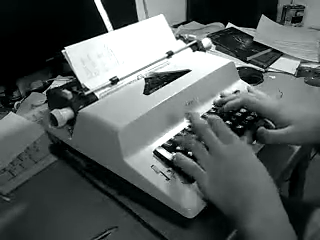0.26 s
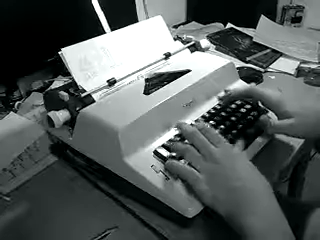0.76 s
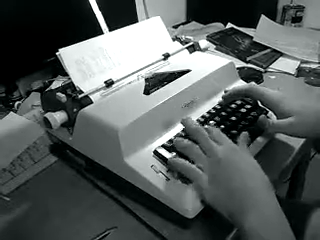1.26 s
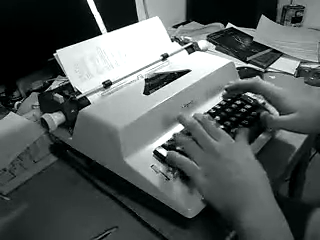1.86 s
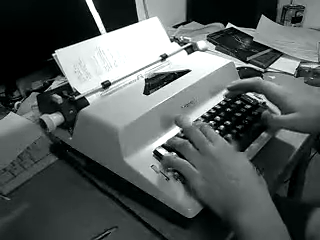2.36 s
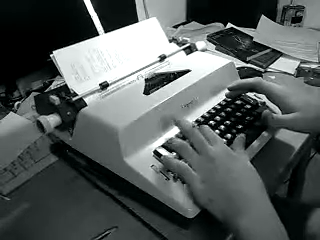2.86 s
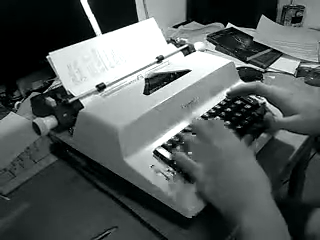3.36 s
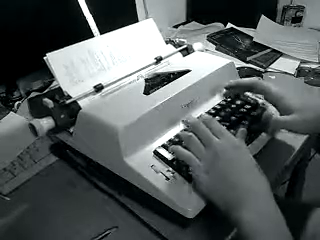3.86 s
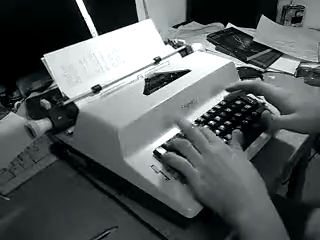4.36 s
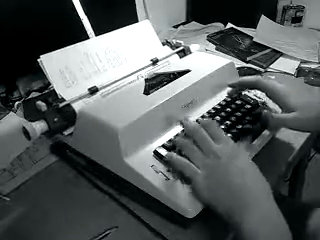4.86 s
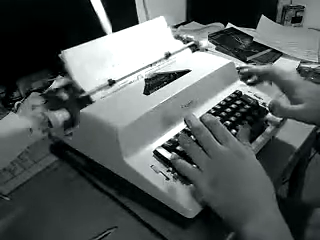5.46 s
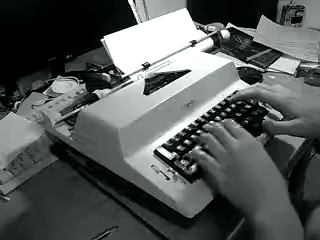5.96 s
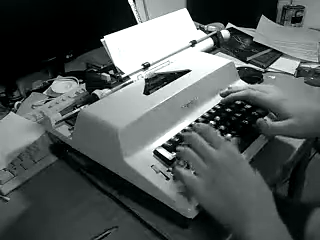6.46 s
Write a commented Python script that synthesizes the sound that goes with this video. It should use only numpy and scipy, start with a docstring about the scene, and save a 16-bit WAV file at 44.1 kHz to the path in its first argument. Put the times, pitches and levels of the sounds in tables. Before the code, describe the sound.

Close, bright electric typewriter typing at a brisk pace in a quiet room, ending with a rattling carriage return and one last keystroke.

```python
"""Electric typewriter, close

A typewriter on a desk in a quiet room, close to a small microphone. Each key trips a linkage, the type bar
swings up and strikes: noise bursts drive steel and case, and single bars ring as dying sines. The carriage
steps on with a thud that booms in the desk. Near the end the motor draws it back, sliding over a throbbing
drone, and it bangs against its stop; small ticks follow. A short echo and a faint hush fill the room."""
import sys
import numpy as np
from scipy import signal
from scipy.io import wavfile
from scipy.ndimage import uniform_filter1d, minimum_filter1d

SR = 44100
rng = np.random.default_rng(int(sys.argv[2]) if len(sys.argv) > 2 else 0)


def how_loud(loudness_db):
    """Turn decibels into a plain amplitude multiplier (0 dB gives 1, 20 dB gives 10)."""
    steps = np.asarray(loudness_db, float) / 20
    return 10 ** steps


def digitize_waveform(pressure):
    """Quantize a signal to 16-bit integers and store it at the path in sys.argv[1].

    Rows of a 2-D input are taken as channels; values are limited to [-1, 1].
    """
    field = np.atleast_2d(pressure).T
    bounded = np.clip(field, -1, 1)
    quanta = np.round(bounded * 32767).astype(np.int16)
    wavfile.write(sys.argv[1], SR, quanta)


N = 295470

# spectrum of the rattling steel: [frequency_hz, relative level_db per Hz]
STEEL_SPECTRUM = [(410, -58), (700, -16), (974, -17), (1170, -15.5), (2020, -11), (2590, -5.5),
                  (2810, -4.5), (3040, -8.5), (3610, -6), (4280, -5), (5100, -3), (5900, -4.5),
                  (6500, -9.5), (7870, -18.5), (14800, -43.5), (15900, -48.5), (16500, -58)]
# small sharp ticks as the machine settles: [start_s, level_db, case_db beside it, length_s]
SETTLING_TICKS = [(5.999, -34.5, -11, 0.023), (6.054, -45.5, -9.5, 0.032), (6.124, -60, -5, 0.065),
                  (6.247, -61.5, -3, 0.022), (6.388, -59.5, -6.5, 0.025)]
# hard strokes, type on platen: [strike_s, trip_lead_s, trip_db, swing_db, carriage_step_db]
HARD_STROKES = [(0.0921, .033, -22, -16.5, -23), (0.4543, 0.033, -18, -24, -23),
                (1.2919, 0.024, -24, -24.5, -23), (1.5289, 0.02, -36.5, -22.5, -25),
                (2.2756, 0.018, -27, -41, -22), (2.8878, 0.026, -37, -32.5, -22),
                (3.057, 0.031, -20, -27, -25.5), (3.2238, 0.027, -24.5, -32, -23.5),
                (3.651, .034, -34, -16, -23), (3.8254, 0.023, -34, -18.5, -23),
                (4.3875, 0.027, -21.5, -25, -22.5), (4.7532, .03, -29, -22, -24),
                (5.0578, 0.023, -23, -23.5, -22), (6.705, 0.045, -30, -30.5, -23)]
# soft strokes, chains of lighter knocks: [main_knock_s, main_db, trip_db, lift_db, rebound_db]
SOFT_STROKES = [(0.297, -12, -18.5, -17.5, -15.5), (0.637, -10.5, -23, -17, -21),
                (.819, -13, -22, -14, -14), (1.035, -16, -22.5, -14.5, -14.5),
                (1.7708, -10.5, -23.5, -13.5, -18.5), (2.538, -12, -23, -12.5, -20.5),
                (3.409, -12.5, -21.5, -22, -12), (4.1762, -9, -25.5, -13, -14.5),
                (4.585, -9.5, -18.5, -17, -15), (4.9086, -13, -20.5, -15.5, -12)]


def evened(x):
    """Scales to rms 1."""
    return x / np.sqrt(np.mean(x ** 2) + 1e-20)


def read(points, hz):
    """Reads a table on a log-frequency axis."""
    f, value = np.transpose(points)
    return np.interp(np.log(hz + 1), np.log(f + 1), value)


def colour(points):
    """Causal impulse response of energy 1 with the given spectrum (minimum phase)."""
    spectrum_db = read(points, abs(np.fft.fftfreq(8192, 1 / SR)))
    log_gain = np.log(how_loud(np.maximum(spectrum_db, -100)))
    taps = np.fft.ifft(np.exp(np.conj(signal.hilbert(log_gain)))).real[:4096]
    return taps / np.linalg.norm(taps)


def ring(modes):
    """Impulse response of energy 1 made of dying modes: [frequency_hz, level_db, t60_s]."""
    t = np.arange(SR // 3) / SR
    taps = sum(how_loud(db - 60 * t / max(t60, .01)) * np.sin(2 * np.pi * hz * t) for hz, db, t60 in modes)
    return taps / np.linalg.norm(taps)


def chatter(spread_db, share):
    """Dense tiny impacts of uneven size on a share of the samples, rms 1."""
    size = how_loud(spread_db * np.minimum(rng.exponential(1, N), 5))
    return evened(size * rng.standard_normal(N) * (rng.random(N) < share))


def burst(s, db, length, swing, swing_db, bend, snap_db):
    """Span and power of a swell up to s, a short snap, and a decay that quickens when bend exceeds 1."""
    at = np.arange(max(round((s - .06) * SR), 0), min(round((s + 0.38) * SR), N))
    t = at / SR - s
    after = np.maximum(t, 0)
    decay = np.exp(-(after / np.clip(length, .003, .2)) ** bend)
    snap = how_loud(snap_db) * np.exp(-after / 0.001)
    rise = how_loud(swing_db) * np.exp(np.minimum(t, 0) / swing)
    return at, (how_loud(db) * np.where(t < 0, rise, decay + snap)) ** 2


def add(mix, at, sound):
    """Mixes in place."""
    mix[at] += sound


def through(drive, taps):
    """Convolution cut to length."""
    return signal.oaconvolve(drive, taps)[:N]


def swing_of(db):
    """Hardness 0 to 1 of a knock, with its swell time (s), swell dB and snap dB: hard blows snap more."""
    hard = np.clip((db + 10) / 5, 0, 1)
    return hard, .0035 + .004 * hard, -6 - 8 * hard, -9 + 7 * hard


def hard_knocks():
    """A hard stroke trips the key, swings the type bar up, strikes and bounces."""
    # bounces of the type bar, timing and level then varied: [after_strike_s, level_db beside the strike]
    bounces = [(.004, 0), (.0105, -5.5), (.024, -11)]
    strike_db, strike_case_db = -4, -28.
    rows = []
    for s, lead, trip_db, swing_db, _ in HARD_STROKES:
        rows.append((s - lead, trip_db, -18.5, .05))
        rows.append((s - .015, swing_db, -12., 0.02))
        rows.append((s, strike_db, strike_case_db, 0.059))
        uneven = rng.uniform(-1, 1, (len(bounces), 2))
        for (lag, db), (late, louder) in zip(bounces, uneven):
            bounce_s = s + lag * (1 + .15 * late)
            rows.append((bounce_s, strike_db + db + 2.5 * louder, strike_case_db, .004))
    return rows


def soft_knocks():
    """A soft stroke is a finger landing, a trip, a lift, a main knock and a rebound."""
    rows = []
    for s, main_db, trip_db, lift_db, rebound_db in SOFT_STROKES:
        rows.append((s - .066, trip_db - 11, -15.5, .05))  # the finger lands
        rows.append((s - .046, trip_db, -20.5, 0.051))
        rows.append((s - .013, lift_db, -25.5, 0.052))
        for lag, db, case_db, length in ((0, main_db, -27, 0.043), (.030, rebound_db, -19.5, 0.043)):
            rows.append((s + lag, db, case_db, length))
            rows.append((s + lag, db + 2, case_db, 0.0018))  # starts with a click
    return rows


def knocks():
    """Every knock of steel on steel: [start_s, level_db, case_db beside it, length_s]."""
    # the return clutch takes hold, later the carriage meets its stop: columns as above
    return_knocks = [(5.3117, -29.5, -18, .05), (5.33, -16.5, -21, 0.047), (5.352, -9, -23.5, 0.02),
                     (5.39, -8.5, -20, 0.022), (5.411, -10.5, -18.5, 0.037), (5.5976, -38, -12, 0.035),
                     (5.7502, -7.5, -19.5, 0.02), (5.789, -7, -27.5, 0.037), (5.8005, -9, -25, 0.043),
                     (5.8387, -14.5, -17.5, 0.06)]
    rows = list(return_knocks) + hard_knocks() + soft_knocks()
    return [row for row in rows if row[0] < N / SR]


def thuds():
    """Every step or landing of the carriage: [start_s, level_db, length_s, desk_boom_db beside it]."""
    # the carriage jerks off and lands: columns as above
    return_thuds = [(5.44, -34.5, 0.078, -10), (5.806, -18, 0.017, -16.5), (5.849, -18.5, 0.025, -28.5)]
    rows = [(s + .063, step_db, 0.026, -21) for s, *_, step_db in HARD_STROKES]
    rows += [(s + .055, -23, 0.022, -22.5) for s, *_ in SOFT_STROKES]
    return [row for row in rows + return_thuds if row[0] < N / SR]


def steel(blows):
    """Heavier levers knock below 4 kHz, light links above; hard blows click and ring the frame more."""
    # frame and type bars: [frequency_hz, level_db, t60_s]
    frame_modes = [(2770, -8, .04), (3680, -7, .05), (4240, -7, .05), (4975, -6, .06), (5245, -5, .07),
                   (5405, -5, .07), (5645, -3, .1), (5755, -2, .12), (5912, -1.5, .12), (6068, -3, .12),
                   (6305, -6, .08), (6510, -9, .07), (9300, -18, .05)]
    light, heavy, frame, clicks = np.zeros((4, N))
    for s, db, _, length in blows:
        hard, swing, swing_db, snap_db = swing_of(db)
        add(light, *burst(s, db - 12.0, length, swing, swing_db, 1.44, snap_db))
        heavy_db = 1.203 * db - 11.0 - 2.5 * hard
        add(heavy, *burst(s, heavy_db, length * 1.01, swing, swing_db, 1.25, snap_db + 5.5))
        add(frame, *burst(s, db - 28.0 + 5.5 * hard, length, swing, swing_db, 1.5, -10.0))
        add(clicks, round(s * SR), hard * how_loud(db + 3.5))  # each hard blow starts with one click
    for s, db, _, length in SETTLING_TICKS:
        for power in (light, heavy):
            add(power, *burst(s, db - 8.5, length, .001, -6, 1, -1))
    low, high = (signal.butter(2, 4000, kind, fs=SR, output="sos") for kind in ("low", "high"))
    rattle = chatter(1.2, 0.3)
    levers = signal.sosfilt(low, np.sqrt(heavy) * chatter(1.2, .25))
    links = signal.sosfilt(high, np.sqrt(light) * rattle)
    struck = through(levers + links + clicks, colour(STEEL_SPECTRUM))
    return struck + through(np.sqrt(frame) * rattle, ring(frame_modes))


def small_parts(blows):
    """Small steel clatters high, nearly as much for light blows as for hard ones; some parts tink alone."""
    # pitches of springs and links: [pitch_hz]
    tink_pitches = [5400, 6220, 7600, 9100, 9500, 10600, 11700, 13000, 14100]
    power = np.zeros(N)
    for s, db, _, length in blows:
        hard, swing, _, _ = swing_of(db)
        add(power, *burst(s, db - 2.7 * hard, length, swing, -8.5, 1.6, -9.0))
    # the second difference tilts the clatter towards the treble
    clatter = np.diff(power ** .43 * chatter(2.2, .1), 2, prepend=[0, 0])
    sound = through(how_loud(-22.0) * clatter, colour(STEEL_SPECTRUM))
    for hz in tink_pitches:
        chance = rng.random(N) < 14 / SR  # 14 openings a second, heard only where the parts move
        struck = power ** 0.42 * chance * how_loud(3.3 * rng.standard_normal(N))
        sound += how_loud(9. + read(STEEL_SPECTRUM, hz)) * through(struck, ring([(hz, 0, .014)]))
    return sound


def bar_pings():
    """Single bars ring out clearly as dying sines; only the long, low bars sound overtones."""
    # bars that ring: [start_s, nominal pitch_hz, level_db]
    ringing_bars = [(.105, 3670, -14.5), (.2987, 3690, -14.5), (.6389, 3700, -11), (0.822, 3680, -15.5),
                    (1.0377, 3680, -17.5), (1.7704, 3656, -12.5), (2.278, 2540, -19.5),
                    (2.5376, 3565, -17.5), (4.9058, 2757, -18.5), (5.059, 3480, -17), (5.3912, 4350, -14),
                    (6.662, 4450, -50)]
    # partials of a bar: [multiple of its nominal pitch, level_db]
    partials = [(1.001, 2), (2.021, -8.5), (3.15, -23)]
    sound = np.zeros(N)
    t = np.arange(1400) / SR
    for s, hz, db in ringing_bars:
        swell = (1 - np.exp(-t / 0.0007)) * how_loud(db - 60 * t / 0.047)
        sounding = partials[:3 if hz < 3900 else 1]
        bar = sum(how_loud(part_db) * np.sin(2 * np.pi * k * hz * t) for k, part_db in sounding)
        add(sound, round(s * SR) + np.arange(len(t)), swell * bar)
    return sound


def case(blows, steps):
    """Knocks, ticks and thuds shake the case, a coloured noise with ringing modes."""
    # spectrum of the case: [frequency_hz, relative level_db per Hz]
    case_spectrum = [(18, -63), (30, -14), (125, -3), (265, -10.5), (353, -26), (550, 4.5), (779, -4.5),
                     (1040, 2), (1260, -1.5), (1500, 0), (3000, -2.5), (3900, -24), (6600, -120)]
    # resonances of the case: [frequency_hz, level_db, t60_s]
    case_modes = [(438, 5, 0.12), (610, -8, 0.063), (983, 1.5, 0.27), (1050, 4.5, 0.06), (1336, 2.5, 0.037),
                  (1590, -1, 0.079)]
    power = np.zeros(N)
    for s, db, case_db, length in blows:
        add(power, *burst(s, db + case_db - 6.0, length * 1.48, 0.0062, -3.5, 1.74, -13.0))
    for s, db, case_db, length in SETTLING_TICKS:
        add(power, *burst(s, db + case_db, length, .001, -6, 1, -1))
    for s, db, length, _ in steps:
        add(power, *burst(s, db - 5.5, length, 0.013, -0.76, 1.0, -16.5))
    drive = np.sqrt(power) * chatter(1.8, .3)
    return through(drive, colour(case_spectrum)) + how_loud(-7.5) * through(drive, ring(case_modes))


def desk(steps):
    """Each thud pushes the desk top with a smooth short pulse, and its modes boom."""
    # boom of the desk top: [frequency_hz, level_db, t60_s]
    desk_modes = [(134.4, -5, 0.24), (247.2, -4.5, 0.21)]
    pushes = np.zeros(N)
    for s, db, _, boom_db in steps:
        add(pushes, round(s * SR) + np.arange(120), how_loud(db + boom_db) * np.hanning(120))
    return through(pushes, ring(desk_modes))


def typing():
    """Knocks rattle the steel and, more weakly, the case; thuds shake the case and push the desk."""
    blows, steps = knocks(), thuds()
    return steel(blows) + small_parts(blows) + bar_pings() + case(blows, steps) + desk(steps)


def carriage():
    """Rack teeth and rollers chatter while the carriage slides, over the wavering drone of the drive."""
    # spectrum of the sliding carriage: [frequency_hz, relative level_db per Hz]
    slide_spectrum = [(35, -66), (60, -22.5), (133, -8.5), (308, -16), (354, -6), (480, -20.5),
                      (636, -12.5), (1620, -8.5), (2970, -13), (5500, -12), (7200, -24.5), (9000, -30.5),
                      (16000, -53)]
    start_s, end_s, drone_peak_s = 5.46, 5.725, 5.524
    t = np.arange(N) / SR
    on = np.interp(t, [start_s - .02, start_s, end_s, end_s + 0.016], [0, 1, 1, 0])
    teeth = chatter(1.8, 0.15)
    slide_ring = ring([(1617, -1, 0.12), (2520, -1, .06)])
    slide = through(teeth, colour(slide_spectrum)) + how_loud(-11.5) * through(teeth, slide_ring)
    waver = evened(uniform_filter1d(rng.standard_normal(N), 900))
    drone = np.sin(2 * np.pi * np.cumsum(356. + 6. * waver) / SR)  # Hz
    # throbs at 10 Hz, 7 dB deep, with a peak at drone_peak_s
    throb = how_loud(-46.5 - 7 * np.sin(np.pi * 10 * (t - drone_peak_s)) ** 2)
    fade_in = np.clip(1 + (t - drone_peak_s) / .04, 0, 1)
    return on * (how_loud(-43.5) * slide + fade_in * throb * drone)


def room(x):
    """Echo of the room: sparse taps of random sign, each band dying at its own speed."""
    # decay of the room: [frequency_hz, t60_s]
    room_decay = [(150, 0.18), (1000, 0.27), (4000, 0.22), (10000, 0.12)]
    taps = np.zeros(SR // 2)
    at = np.arange(300, SR // 2 - 20, 20)
    taps[at + rng.integers(0, 20, len(at))] = rng.choice([-1., 1.], len(at))
    hz, t, z = signal.stft(taps, SR, nperseg=256)
    fall = how_loud(-60 * t / read(room_decay, hz)[:, None])
    tail = signal.istft(z * fall, SR, nperseg=256)[1]
    return through(x, tail / np.linalg.norm(tail))


def air():
    """The faint hush of room and idling motor: shaped noise in drifting patches of time and pitch."""
    # spectrum of the hush: [frequency_hz, relative level_db per Hz]
    hush_spectrum = [(18, -46.5), (30, -13.5), (48, -14), (122, 4), (173, -16), (272, -4.5), (317, -19.5),
                     (689, -9.5), (2020, -20), (2800, -21.5), (12000, -42), (15600, -51), (22000, -120)]
    frame_count, hz = N // 256 + 5, np.fft.rfftfreq(1024, 1 / SR)
    real, imaginary, patches = rng.standard_normal((frame_count, 513, 3)).T
    patches = evened(uniform_filter1d(uniform_filter1d(patches, 8, 0), 8, 1))
    z = (real + 1j * imaginary) * how_loud(read(hush_spectrum, hz)[:, None] + 3.2 * patches)
    hush = signal.istft(z, nperseg=1024, noverlap=768)[1][:N]
    return how_loud(-72.5) * evened(hush)


def scene():
    """Machine, its echo in the room, and the hush."""
    machine = typing() + carriage()
    return (machine + how_loud(-16.0) * room(machine) + air())[None]


def top_cut(x):
    """Nothing passes above the cut-off."""
    return signal.sosfilt(signal.butter(12, 16650, fs=SR, output="sos"), x)


def record(dry):
    """The small microphone loses deep bass and top treble; a fast limiter holds the peaks."""
    heard = signal.sosfilt(signal.butter(2, 110., "high", fs=SR, output="sos"), dry)
    ceiling = .54
    needed_gain = np.minimum(ceiling / (abs(heard) + 1e-9), 1)
    # lowest gain within 41 samples, then smoothed
    limiter_gain = uniform_filter1d(minimum_filter1d(needed_gain, size=41), size=41)
    treble_cut = signal.cheby1(8, .5, 15300, fs=SR, output="sos")
    return top_cut(signal.sosfilt(treble_cut, heard * limiter_gain))


dry = scene()
out = record(dry)
digitize_waveform(out)
```